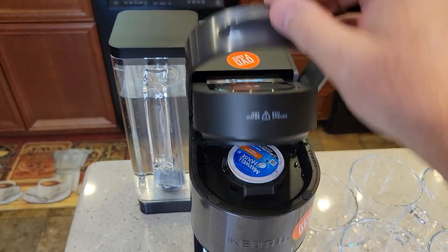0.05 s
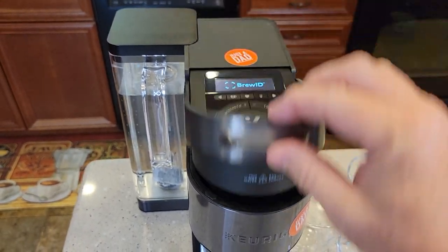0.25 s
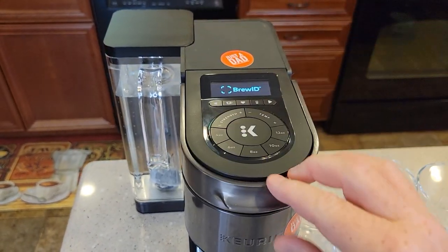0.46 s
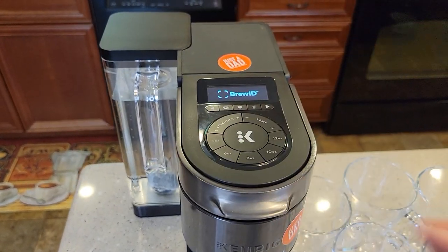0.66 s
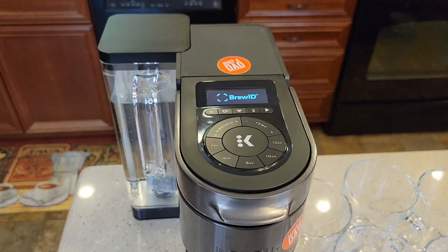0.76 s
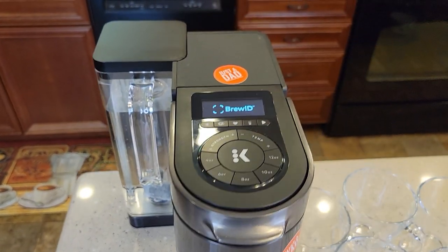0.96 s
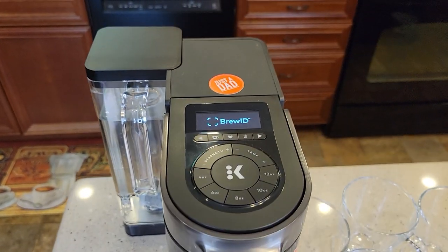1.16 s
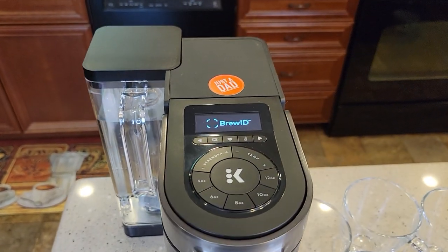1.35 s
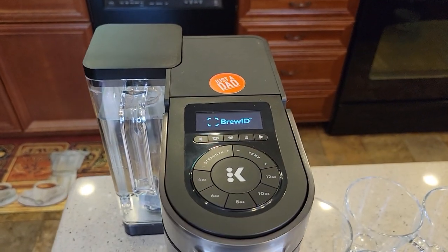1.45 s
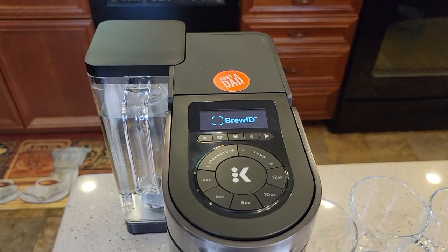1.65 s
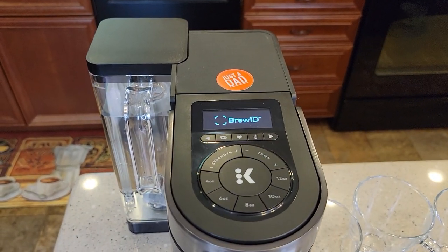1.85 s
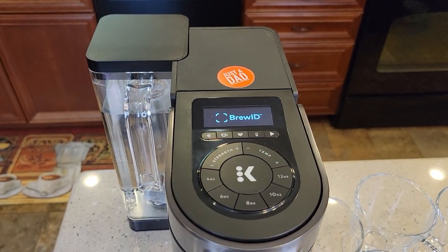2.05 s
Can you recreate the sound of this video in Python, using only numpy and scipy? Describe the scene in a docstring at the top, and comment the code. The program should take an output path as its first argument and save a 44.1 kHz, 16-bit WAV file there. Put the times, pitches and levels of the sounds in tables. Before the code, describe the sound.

Close up in a lively kitchen, a plastic machine lid swings shut with small ticks, loud crisp catch clicks and hinge rub, ending in a dull hollow thump, then only faint room hum.

```python
"""A hard kitchen, where the lid of a coffee maker is swung down over a pod.
Hinge and latch parts tick and rub, needles and catches snap, then the lid lands with a hollow clunk.
Pushes, chatter and tiny slips set the modes of the machine ringing, and dying noise answers as the room.
Banded noise makes the low, slightly wavering hum of the house beneath."""
import sys
import numpy as np
from scipy import signal
from scipy.io import wavfile
from scipy.ndimage import uniform_filter1d

SR = 44100
rng = np.random.default_rng(int(sys.argv[2]) if len(sys.argv) > 2 else 0)


def amplitude_ratio(level_db):
    """Convert a level in decibels to the matching linear amplitude (field) ratio."""
    exponent = np.asarray(level_db, float) / 20
    return 10 ** exponent


def file_out(sig):
    """Save sig as 16-bit WAV at sys.argv[1]."""
    # one column per channel
    cols = np.atleast_2d(sig).T
    # limit, then scale
    lim = np.clip(cols, -1, 1)
    pcm = np.round(lim * 32767).astype(np.int16)
    wavfile.write(sys.argv[1], SR, pcm)


N = 92874  # length in samples


def at_hz(table, hz, axis=1):
    """Read a column of a table on a log-frequency axis."""
    table = np.array(table)
    return np.interp(np.log(hz), np.log(table[:, 0]), table[:, axis])


def in_time(rows):
    """Join (seconds, value) points by straight lines."""
    return np.interp(np.arange(N) / SR, *np.transpose(rows))


def rms_one(x):
    """Scale to rms 1."""
    return x / np.sqrt(np.mean(x ** 2) + 1e-20)


def drift(hz):
    """Slow chance with spread 1: noise through two equal low-pass poles at hz."""
    pole = np.exp(-2 * np.pi * hz / SR)
    slow = signal.lfilter([1], [1, -2 * pole, pole * pole], rng.standard_normal(N + SR))
    return rms_one(slow[SR:])  # the first second lets the filter settle


def bands(size):
    """Third-octave bands of noise, neighbours unrelated: (centre Hz, noise of unit density)."""
    edges = 40 * 2 ** np.arange(0, 8.8, 1 / 3)
    white = rng.standard_normal((2, size))
    for k, (low, high) in enumerate(zip(edges, edges[1:])):
        band_pass = signal.butter(3, [low, high], "band", fs=SR, output="sos")
        yield np.sqrt(low * high), signal.sosfilt(band_pass, white[k % 2])


def hum():
    """Dull noise of the house, each band flickering a little while the whole wavers."""
    # Tone of the hum. Each row: frequency in Hz, relative density in dB per Hz.
    hum_tone = [(40, -30), (80, -22), (125, -14), (220, -3), (320, -8), (500, 0), (800, -11), (1280, -23),
                (1600, -41), (2000, -37), (2550, -47), (3200, -34), (4000, -31), (5000, -29), (6300, -33),
                (8000, -47), (16000, -53)]
    # Wavering of the hum. Each row: time in seconds, rms level in dB.
    hum_level = [(0.85, -57), (1.198, -55.5), (1.604, -60.5), (1.616, -57), (1.936, -55.5), (2.1, -56)]
    flicker_db, flicker_hz = 1, 9.6
    noise = 0
    for hz, band in bands(size=N):
        noise = noise + amplitude_ratio(at_hz(hum_tone, hz) + flicker_db * drift(flicker_hz)) * band
    return amplitude_ratio(in_time(hum_level)) * rms_one(noise)


def kitchen(x):
    """Reflections thicken quickly, then die band by band."""
    # Room tail. Each row: frequency in Hz, relative level in dB, time to fall 60 dB in seconds.
    room_tail = [(80, -8.5, 0.18), (203, -12, 0.25), (517, -12.5, 0.5), (1196, -14, 0.51),
                 (2600, -6.5, .48), (5000, -9.5, 0.5), (9000, -3, 0.26), (14940, -9, .22)]
    first_echo_s, build_s = 0.0019, 0.0027
    t = np.arange(SR) / SR
    rise = np.clip((t - first_echo_s) / build_s, 0, 1)
    tail = 0
    for hz, noise in bands(size=SR):
        fall = amplitude_ratio(-60 * t / at_hz(room_tail, hz, axis=2))
        level = amplitude_ratio(at_hz(room_tail, hz)) / np.sqrt(np.sum(fall ** 2))
        tail = tail + noise * fall * rise * level
    return signal.fftconvolve(x, tail)[:N]


def modes(count):
    """Clear modes and scattered thin ones: (Hz, relative dB, t60 s, spread dB from blow to blow)."""
    # Clear modes of the machine and the counter under it; pitch tells the part a mode belongs to.
    # Each row: frequency in Hz, relative level in dB, time to fall 60 dB in seconds.
    clear_modes = [(66.96, -26, .3), (90.55, -29, 0.23), (172.3, -26.5, 0.2), (228.96, -12.5, 0.11),
                   (248.45, -19.5, 0.66), (297.7, 6.5, 0.019), (358.6, -10.5, 0.096), (420, -14.5, 0.045),
                   (605, -7, 0.061), (843, -4, .02), (1010, -7.5, 0.014), (1152, -3, 0.031),
                   (1568, -4.5, 0.01), (2480, -13.5, 0.017), (2829, -7.5, 0.031), (3700, -4.5, 0.011),
                   (4130, -6, .01), (5810, -11.5, .01)]
    # Guide for the many small, short modes of the thin plastic.
    # Each row: frequency in Hz, relative level in dB, time to fall 60 dB in seconds.
    thin_plastic = [(463.7, -15.5, 0.0096), (1000, -7.5, 0.012), (1500, -20, 0.032), (1950, -22.5, 0.0034),
                    (2772, -13.5, 0.0033), (4000, -12.5, 0.0061), (6000, -12, 0.0027),
                    (10000, -16.5, 0.0023), (11850, -25.5, 0.003), (15730, -31, .004)]
    clear_spread_db, thin_spread_db = 3.5, 3
    body = [(*mode, clear_spread_db) for mode in clear_modes]
    thin_hz = np.geomspace(thin_plastic[0][0], thin_plastic[-1][0], count) * rng.uniform(1.0, 1.02, count)
    for hz in thin_hz:
        body.append((hz, at_hz(thin_plastic, hz), at_hz(thin_plastic, hz, axis=2), thin_spread_db))
    return body


def part(hz):
    """Part of the machine by pitch: 0 hollow, 1 shell, 2 catch, 3 bright."""
    return int(hz > 450) + int(hz > 2000) + int(hz > 3250)


def ring(force, hz, t60):
    """A force sets a decaying sine ringing; little is radiated far from the mode."""
    reach = 1.597  # frequency ratio to either edge of the radiated band
    decay, turn = amplitude_ratio(-60 / (t60 * SR)), 2 * np.pi * hz / SR
    near = signal.butter(1, [hz / reach, min(hz * reach, .45 * SR)], "band", fs=SR)
    resonance = [1, -2 * decay * np.cos(turn), decay * decay]
    sine = signal.lfilter([.5, 0, -.5], resonance, force + 1e-18)
    return signal.lfilter(*near, sine)


def hinge(body):
    """The hinge rubs while the lid swings: dense uneven slips sound through the modes."""
    # Swell of the rub. Each row: time in seconds, rms level in dB.
    rub_level = [(0, -40.5), (.03, -51.5), (.06, -44), (.12, -51.5), (.15, -39.5), (.2, -23.5),
                 (.25, -27.5), (.31, -42.5), (.36, -49.5), (.4, -72)]
    # Relative level in dB of the hollow, shell, catch and bright parts in the rub.
    rub_part_db = (-7, -3.5, -14.5, 0)
    slips_per_s, grain_db = 5000, 2.5
    happens = rng.random(N) < slips_per_s / SR
    strength = amplitude_ratio(grain_db * np.minimum(rng.exponential(1, N), 5))
    slips = happens * strength * rng.choice([-1, 1], N)
    rub = 0
    for k, (hz, db, t60, _) in enumerate(body):
        rub = rub + (-1) ** k * amplitude_ratio(db + rub_part_db[part(hz)]) * ring(slips, hz, t60)
    return amplitude_ratio(in_time(rub_level)) * rms_one(rub)


def contacts(body):
    """Each contact pushes the hollow part and chatters on the rest, with new strengths for every mode."""
    # Contacts of lid, catches and pod. Each row: start in seconds, relative push on the hollow part in dB,
    # peak of the shell in dB, of the catch in dB, of the bright part in dB,
    # time constant of the chatter in ms, where the shell answers most in Hz.
    contact_rows = [(0.0346, -54.5, -27, -46, -47.5, 2.1, 939),
                    (0.0409, -45.5, -25.5, -45.5, -32.5, 1.7, 1000),
                    (0.0434, -34.5, -27, -46, -38.5, 3.4, 962.3),
                    (0.055, -40.5, -36.5, -45, -40.5, 1.3, 805.7),
                    (0.079, -44, -39.5, -50.5, -38.5, 3.2, 900), (0.0914, -38, -35.5, -46.5, -35.5, 4, 900),
                    (0.0983, -38, -28, -44, -29, 0.83, 1048), (.1472, -23, -13.5, -15, -3, 0.91, 1149),
                    (0.1498, -20, -5.5, -15, -13, 5.2, 1000), (0.16, -28, -16.5, -19, -13, 9.1, 800),
                    (0.172, -22, -19.5, -25, -16.5, 1.3, 651.3), (0.179, -19, -13.5, -25, -17.5, 2.5, 950),
                    (.187, -32, -15, -21, -21.5, 1.5, 1000), (.221, -35, -25, -23.5, -30, 2.5, 1550),
                    (0.242, -40, -20, -21.5, -16, 1.5, 1098), (0.253, -22, -9, -16, -12.5, 0.9, 1107),
                    (0.2552, -25.5, -4, -15.5, -13, 0.95, 1067), (0.272, -25, -16, -17.5, -17.5, 1.4, 1150),
                    (0.2747, -27, -11, -13, -6, 1.2, 1099), (0.2838, -23.5, -20.5, -27.5, -20, 0.62, 901.4),
                    (0.2856, -24, -21.5, -20, -11.5, 1.2, 1088), (.288, -18, -12.5, -18, -19, 1, 900),
                    (.292, -21, -15, -16, -25, 3, 591.5), (0.299, -16, -28, -27.5, -20.5, 1.5, 612),
                    (0.3687, -15, -27, -53.5, -27, 2.3, 1423), (0.3717, -1.5, -8, -40.5, -25, 4.44, 749),
                    (.3755, -9, -28.5, -56, -33, 0.98, 802), (.385, -22.5, -22.5, -42.5, -40, 5.5, 679),
                    (.39, -27, -37, -52, -42.5, 4.4, 572), (0.419, -19.5, -55.5, -43, -39, 1.5, 600),
                    (.438, -24, -34, -36, -38, 2.4, 884)]
    push_ms, shell_focus_db_per_octave = 1.1, 11.5
    first_touch = 4.4  # size of the opening click against the chatter
    rows = np.array(contact_rows)
    starts = (rows[:, 0] * SR).astype(int)
    age_ms = np.arange(5000) / SR * 1000
    grains = rng.laplace(size=(len(rows), len(age_ms))) + first_touch * (age_ms == 0)
    chatter = grains * np.exp(-age_ms / np.maximum(rows[:, 5:6], .1))
    push = signal.windows.hann(int(push_ms * SR / 1000) + 2)
    chance = rng.standard_normal((len(rows), len(body), 2))  # strength and sign
    out, parts = np.zeros(N), np.zeros((4, *chatter.shape))
    for m, (hz, db, t60, spread_db) in enumerate(body):
        gains = amplitude_ratio(db + spread_db * np.clip(chance[:, m, 0], -1.5, 1.5))
        if part(hz) == 0:
            force = np.zeros(N)
            force[starts] = -gains * amplitude_ratio(rows[:, 1])
            out += ring(np.convolve(force, push / push.sum())[:N], hz, t60)
        else:
            focus = 1
            if part(hz) == 1:
                focus = amplitude_ratio(-shell_focus_db_per_octave * abs(np.log2(hz / rows[:, 6])))
            strengths = gains * focus * np.sign(chance[:, m, 1])
            parts[part(hz)] += strengths[:, None] * ring(chatter, hz, t60)
    for p in (1, 2, 3):
        # peak: that of a sine as strong as the loudest 90 samples
        peak = np.sqrt(2 * uniform_filter1d(parts[p] ** 2, size=90).max(axis=1))
        for start, db, sound in zip(starts, rows[:, 1 + p], parts[p] / peak[:, None]):
            out[start:start + len(sound)] += amplitude_ratio(db) * sound
    return out


def scene():
    """Machine, its room and the hum."""
    body = modes(count=70)
    machine = contacts(body) + hinge(body)
    return (machine + kitchen(machine) + hum())[None]


def band_limit(x):
    """A steep low-pass at the top of the band."""
    return signal.sosfilt(signal.butter(12, 16260, fs=SR, output="sos"), x)


def record(dry):
    """The microphone has a dip and a dull top; peaks are rounded and the deep bass is dropped."""
    dip_hz, dip_width_hz, dip_share = 1990, 500, .65
    top_hz, bass_cut_hz = 14200, 78
    clip_top = 1.02  # height that rounded peaks approach
    dip = signal.lfilter(*signal.iirpeak(dip_hz, dip_hz / dip_width_hz, fs=SR), dry)
    heard = signal.lfilter(*signal.butter(2, top_hz, fs=SR), dry - dip_share * dip)
    rounded = clip_top * np.tanh(heard / clip_top)
    bass_cut = signal.butter(4, bass_cut_hz, "high", fs=SR, output="sos")
    return band_limit(signal.sosfilt(bass_cut, rounded))


dry = scene()
out = record(dry)
file_out(out)
```